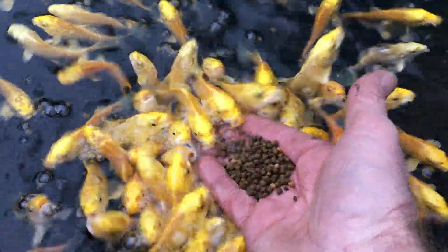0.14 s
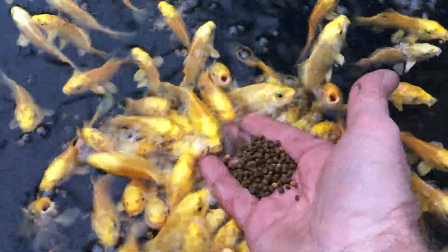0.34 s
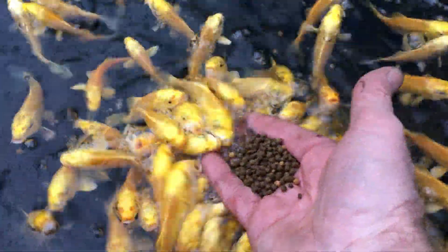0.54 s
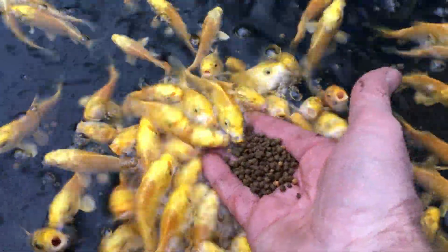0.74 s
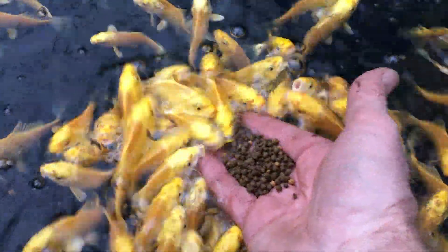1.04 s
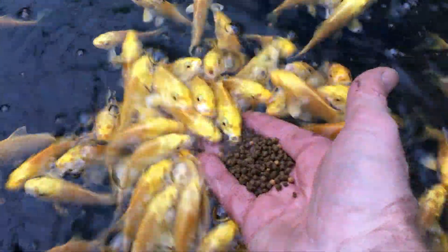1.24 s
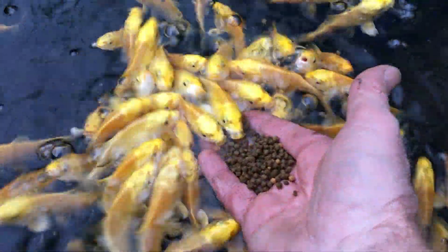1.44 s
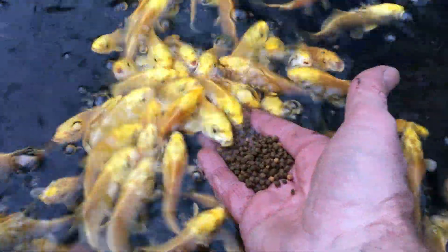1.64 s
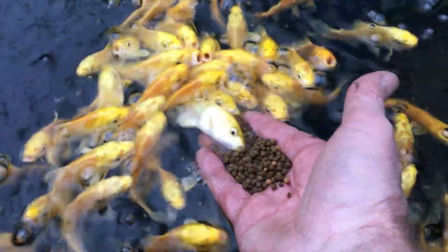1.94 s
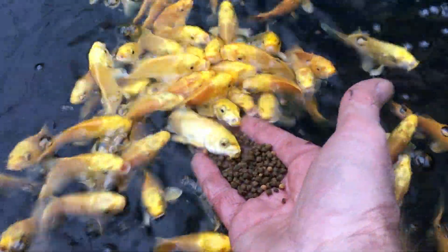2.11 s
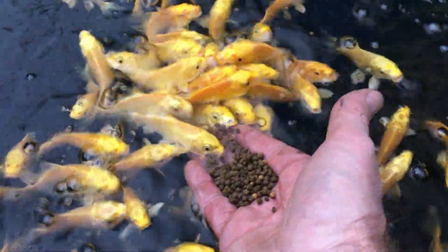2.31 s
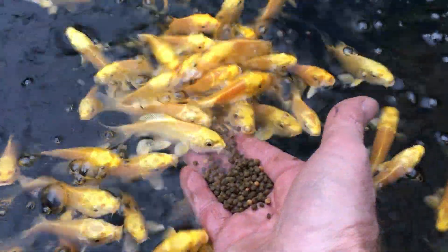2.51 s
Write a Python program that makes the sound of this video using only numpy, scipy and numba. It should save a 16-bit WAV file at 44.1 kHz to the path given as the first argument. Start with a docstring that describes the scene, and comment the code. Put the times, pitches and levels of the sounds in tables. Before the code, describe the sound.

Wet clicks, bubble pops and small gulps from crowding fish, close up, with running water and faint hum behind

```python
"""At a pond, carp crowd at the surface and suck at food, close under a small microphone.
Running water is a steady hiss of shaped noise; a mains pump hums with a few sine tones.
Mouths pop air bubbles and gulp, heard as short fading tones whose pitch climbs, and snap the water film.
Small noise puffs add wet slaps, froth and spray; many fainter bubbles and droplets crackle around them."""
import sys
import numpy as np
from scipy import signal
from scipy.fft import rfft, irfft
from scipy.io import wavfile
from scipy.ndimage import uniform_filter1d
from numba import njit

SR = 44100
rng = np.random.default_rng(int(sys.argv[2]) if len(sys.argv) > 2 else 0)


def invert_db(x):
    """Field ratio 10**(x/20) for x, a level in decibels (scalar or array-like)."""
    u = np.asarray(x, float) / 20
    return 10 ** u


def put_to_file(sound):
    """Save the sound as 16-bit audio at rate SR, in the file named by the first command-line argument."""
    columns = np.atleast_2d(sound).T  # one column per channel
    safe = np.clip(columns, -1, 1)
    whole_steps = np.round(safe * 32767)
    wavfile.write(sys.argv[1], SR, whole_steps.astype(np.int16))


N = 117747  # length in samples

# In the tables of events, level_db is the level before the ring's swell and fade;
# pitch_hz is where the pitch starts; fade_s is the time to fade by 60 dB.

# Outline of water hiss and pump rumble, before the overall level is set: [pitch_hz, level_db_per_hz]
WATER_SHAPE = [(25, -31), (59, -0.5), (105, -3), (145, -18.5), (185, -9.5), (240, -20.5), (400, -17.5),
               (520, -23), (620, -17), (850, -15), (1800, -19.5), (3800, -22.5), (4900, -26), (6400, -23.5),
               (9300, -24), (10500, -26), (12000, -23), (15700, -26.5)]
# Tones of the pump hum, before they waver: [multiple_of_mains, rms_level_db]
PUMP_TONES = [(2, -41), (4, -50.5), (6, -56), (12, -58), (14, -54.5), (18, -59.5)]
# The loudest snaps of the water film: [start_s, level_db, pitch_hz]
FILM_SNAPS = [(0.0132, -17.5, 7200), (0.1504, -15, 12600), (0.1801, -15.5, 6440), (0.2434, -19.5, 10180),
              (0.3138, -11, 15000), (0.4511, -8.5, 7740), (0.5303, -6.5, 13100), (0.532, -5, 14200),
              (0.5336, -19, 6030), (0.5466, -13, 9600), (0.5916, -9.5, 5600), (0.5937, -13, 12800),
              (0.756, -8, 5900), (0.8402, -15.5, 13600), (0.8616, -23, 13200), (0.8911, -13.5, 10500),
              (0.938, -17, 11500), (0.9479, -9, 6560), (0.9542, -9.5, 13900), (1.015, -14, 9450),
              (1.0188, -10.5, 12200), (1.2543, -18, 8200), (1.3715, -14, 12700), (1.452, -12, 9000),
              (1.5043, -11.5, 5700), (1.5064, -9, 12800), (1.5916, -9.5, 8960), (1.84, -24, 14400),
              (1.999, -19.5, 11500), (2.0894, -16, 8400), (2.4089, -12, 11900), (2.487, -12.5, 14300)]
# The loudest bubbles popped by the mouths: [start_s, level_db, pitch_hz, fade_s]
MOUTH_BUBBLES = [(0.0138, -21, 3040, 0.0093), (0.4514, -15.5, 3175, 0.025), (0.5323, -21, 3390, 0.028),
                 (0.5719, -18.5, 4200, 0.014), (0.574, -22, 1600, 0.011), (0.5749, -13, 3950, 0.0075),
                 (0.5921, -11.5, 3100, 0.0038), (0.6708, -25, 1470, 0.017), (0.7554, -26, 1980, 0.036),
                 (0.7708, -25.5, 2920, 0.021), (0.8109, -11, 2740, 0.0032), (0.8138, -20, 2230, 0.0049),
                 (0.8903, -21.5, 2980, 0.014), (0.8936, -13.5, 1910, 0.0083), (0.899, -19.5, 1730, 0.0089),
                 (0.9543, -17, 2920, 0.008), (0.9566, -24, 1200, 0.018), (1.017, -10.5, 2460, 0.0035),
                 (1.1589, -11.5, 2670, 0.0058), (1.3598, -17, 2700, 0.014), (1.45, -11, 2390, 0.005),
                 (1.4549, -12.5, 1950, 0.0058), (1.507, -12, 2050, 0.0045), (1.5114, -14, 2600, 0.006),
                 (1.5317, -20, 2204, 0.026), (1.5339, -14, 2650, 0.016), (1.535, -28.5, 640, 0.028),
                 (1.5351, -22, 1250, 0.034), (1.5376, -15.5, 2680, 0.0072), (1.5927, -16, 3880, 0.011),
                 (1.6364, -20.5, 3680, 0.0052), (2.059, -20, 2960, 0.011), (2.146, -22, 4440, 0.0059),
                 (2.4074, -16, 2880, 0.0041), (2.4897, -17.5, 3400, 0.0054), (2.546, -21.5, 3720, 0.027)]
# Slower gulps that swell before they fade: [start_s, level_db, pitch_hz, fade_s]
MOUTH_GULPS = [(0.108, -23, 2480, 0.028), (0.171, -13, 2350, 0.021), (0.534, -10.5, 1383, 0.024),
               (0.5695, -20, 3730, 0.03), (0.819, -14, 1640, 0.022), (1.497, -20.5, 3130, 0.032),
               (1.5175, -19.5, 2120, 0.023)]

WATER_DB = -37
NOISE_LOW_CUT_HZ, NOISE_HIGH_CUT_HZ = 12, 15850  # abrupt cuts, not part of the water's own outline
WATER_FLICKER_DB, HUM_WAVER_DB, GULP_FLUTTER_DB = 1.57, 2, 3.7  # depths, before the walk is smoothed
MAINS_HZ = 60
RING_SWELL_CYCLES, GULP_SWELL_CYCLES = 0.35, 6.0
RING_RISE, GULP_RISE = 0.04, 0.074  # share by which the pitch climbs over a ring
SHED_DB, SHED_S, SHED_OCTAVES = -7, 0.0079, 0.54  # smaller rings: level below main ring, delay and pitch spread
CROWD_DB, CROWD_EXTRA_DB = -31.5, 7  # faintest main ring, and how much louder one may be
CROWD_LOW_HZ, CROWD_HIGH_HZ, CROWD_FADE_CYCLES = 1510, 14800, 15.8
SNAP_FADE_S = 0.0028
# Noise puffs: level against the event before filtering, and time to die to about a third
SPRAY_DB, SLAP_DB, SPRAY_S = -10, -14, 0.0012  # slaps share the spray's decay
FROTH_DB, FROTH_S = -14, 0.0038
MIX_TOP_HZ = 16700


def walk(rate_hz):
    """Wandering levels: random steps, each held 1 / rate_hz seconds, then smoothed twice."""
    hold = int(SR / rate_hz)
    steps = np.repeat(rng.standard_normal(N // hold + 1), hold)
    return uniform_filter1d(uniform_filter1d(steps, hold), hold)[:N]


@njit
def rings(start_s, size, pitch_hz, fade_s, rise, swell_cycles):
    """Add sines that each swell, then fade by 60 dB while the pitch climbs by the share rise."""
    sound = np.zeros(N)
    for k in range(len(start_s)):
        length = fade_s[k] * SR
        first = int(start_s[k] * SR)
        for i in range(min(int(length), N - first)):
            cycles = pitch_hz[k] * i / SR
            swell = 1 - np.exp(-(cycles / swell_cycles) ** 2)
            fade = 1000. ** (-i / length)
            # half the rise, because phase adds up the climbing pitch
            phase = 2 * np.pi * cycles * (1 + rise * i / length / 2)
            sound[first + i] += size[k] * swell * fade * np.sin(phase)
    return sound


def burst(start_s, level_db, pitch_hz, fade_s, shed_s, count):
    """Each main ring sheds count smaller, shorter rings, mostly lower in pitch; late ones tend to be fainter."""
    delay, bend, loss = np.moveaxis(rng.random((len(start_s), count, 3)), 2, 0)
    late_s = start_s[:, None] + shed_s * delay
    late_hz = np.minimum(pitch_hz[:, None] * 2 ** (SHED_OCTAVES * (bend - 0.6)), SR / 3)
    late_size = invert_db(level_db[:, None] + SHED_DB - 5.6 * delay * loss)
    late_fade_s = np.repeat(fade_s, count) / 2
    main = rings(start_s, invert_db(level_db), pitch_hz, fade_s, RING_RISE, RING_SWELL_CYCLES)
    shed = rings(late_s.ravel(), late_size.ravel(), late_hz.ravel(), late_fade_s,
                 RING_RISE, RING_SWELL_CYCLES)
    return main + shed


def puffs(start_s, level_db, band, decay_s):
    """A dying puff of filtered noise at each event."""
    kicks = np.bincount((start_s * SR).astype(int), invert_db(level_db), N)
    envelope = signal.lfilter([1], [1, -np.exp(-1 / (decay_s * SR))], kicks)
    return signal.sosfilt(band, envelope * rng.standard_normal(N))


def wet_puffs(start_s, level_db, decay_s):
    """Puffs kept to the middle pitches, for a wet sound."""
    band = signal.butter(2, (1100, 5000), "band", fs=SR, output="sos")
    return puffs(start_s, level_db, band, decay_s)


def columns(table):
    """Turn table rows into one array per column."""
    return np.array(table, float).T.copy()


def water():
    """Running water and pump rumble: noise shaped over pitch, cut off sharply at both ends, with a slight flicker."""
    hz = np.arange(N // 2 + 1) * SR / N + 1  # one added so the logarithm never meets zero
    shape_hz, shape_db = columns(WATER_SHAPE)
    gain = invert_db(np.interp(np.log(hz), np.log(shape_hz), shape_db))
    gain = gain * (hz < NOISE_HIGH_CUT_HZ) * (hz > NOISE_LOW_CUT_HZ)
    noise = irfft(rfft(rng.standard_normal(N)) * gain, N)
    noise = noise * invert_db(WATER_FLICKER_DB * walk(20))
    return noise * invert_db(WATER_DB) / noise.std()


def pump():
    """Pump hum: sines at multiples of the mains frequency, each wavering a little in level."""
    time_s = np.arange(N) / SR
    hum = np.zeros(N)
    for multiple, level_db in PUMP_TONES:
        cycles = round(multiple) * MAINS_HZ * time_s + rng.random()
        level = np.sqrt(2) * invert_db(level_db + HUM_WAVER_DB * walk(5.16))  # root two turns rms into peak
        hum += level * np.sin(2 * np.pi * cycles)
    return hum


def crowd(count):
    """Faint droplets and bubbles from fish further off: short rings at random, each shedding its own."""
    when, pitch, size = rng.random((count, 3)).T.copy()
    pitch_hz = CROWD_LOW_HZ * (CROWD_HIGH_HZ / CROWD_LOW_HZ) ** pitch ** 0.813
    level_db = CROWD_DB + CROWD_EXTRA_DB * size ** 3  # the cube keeps most of them faint
    return burst(when * N / SR, level_db, pitch_hz, CROWD_FADE_CYCLES / pitch_hz, SHED_S, count=3)


def snaps():
    """Water film snaps: very short high rings, each with a spit of bright noise as spray."""
    start_s, level_db, pitch_hz = columns(FILM_SNAPS)
    fade_s = np.full(len(start_s), SNAP_FADE_S)
    bright = signal.butter(2, 2500, "high", fs=SR, output="sos")
    spray = puffs(start_s, level_db + SPRAY_DB, bright, SPRAY_S)
    return burst(start_s, level_db, pitch_hz, fade_s, SHED_S / 2, count=2) + spray


def bubbles():
    """Popped air bubbles: ringing tones, each with a quick wet slap and longer ragged froth."""
    start_s, level_db, pitch_hz, fade_s = columns(MOUTH_BUBBLES)
    slap = wet_puffs(start_s, level_db + SLAP_DB, SPRAY_S)
    froth = wet_puffs(start_s, level_db + FROTH_DB, FROTH_S)
    return burst(start_s, level_db, pitch_hz, fade_s, SHED_S, count=6) + slap + froth


def gulps():
    """Gulps: rings that swell over more cycles and flutter in level, with froth."""
    start_s, level_db, pitch_hz, fade_s = columns(MOUTH_GULPS)
    tones = rings(start_s, invert_db(level_db), pitch_hz, fade_s, GULP_RISE, GULP_SWELL_CYCLES)
    froth = wet_puffs(start_s, level_db + FROTH_DB, FROTH_S)
    return tones * invert_db(GULP_FLUTTER_DB * walk(460)) + froth


def scene():
    """Fish over water and pump, added together as one channel."""
    background = water() + pump()
    fish = crowd(count=250) + snaps() + bubbles() + gulps()
    return (background + fish)[None]


def top_cut(x):
    """Nothing passes above the cut-off."""
    return signal.sosfilt(signal.butter(12, 17000, fs=SR, output="sos"), x)


def record(dry):
    """A steep filter cuts the highest treble."""
    low_pass = signal.ellip(12, 0.2, 80, MIX_TOP_HZ, fs=SR, output="sos")
    mix = signal.sosfilt(low_pass, dry)
    return top_cut(mix)


dry = scene()
out = record(dry)
put_to_file(out)
```